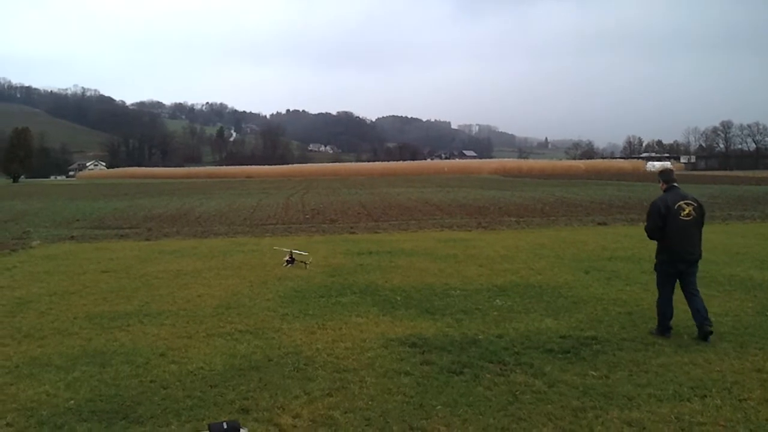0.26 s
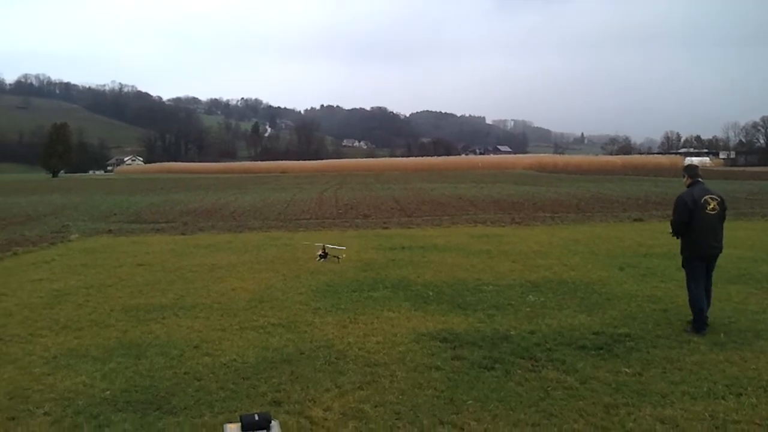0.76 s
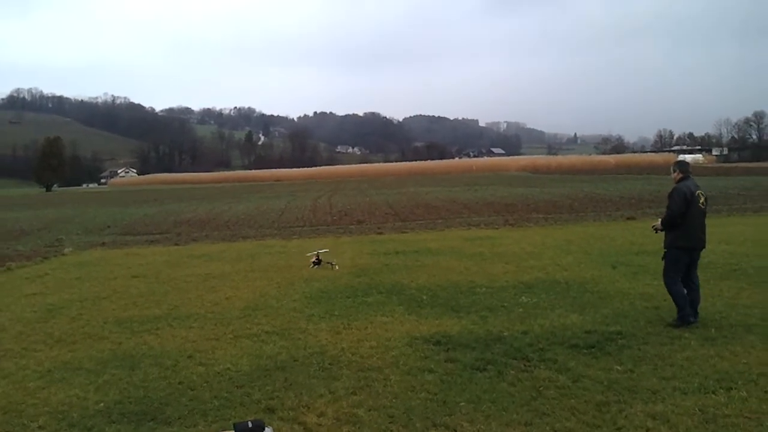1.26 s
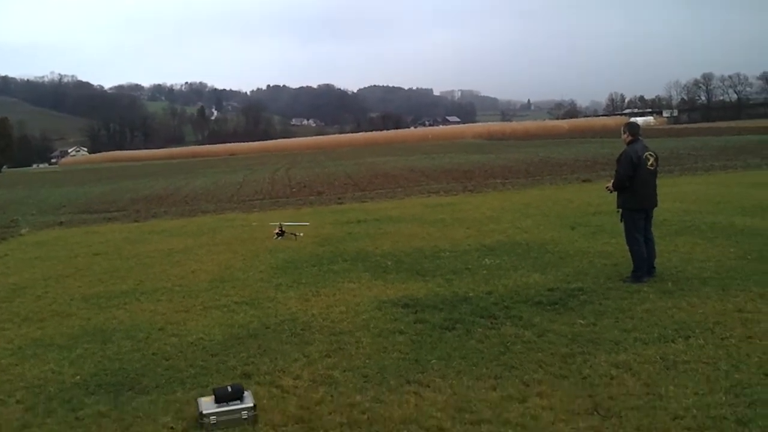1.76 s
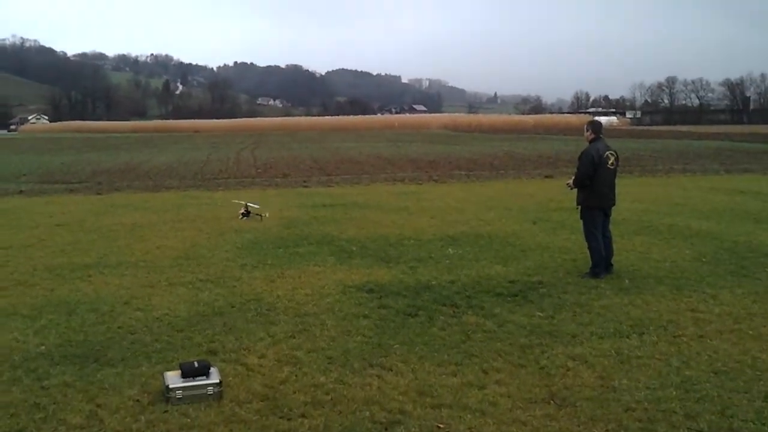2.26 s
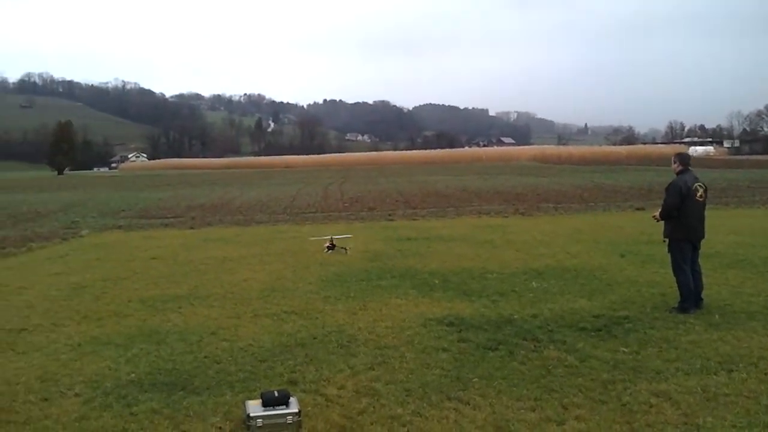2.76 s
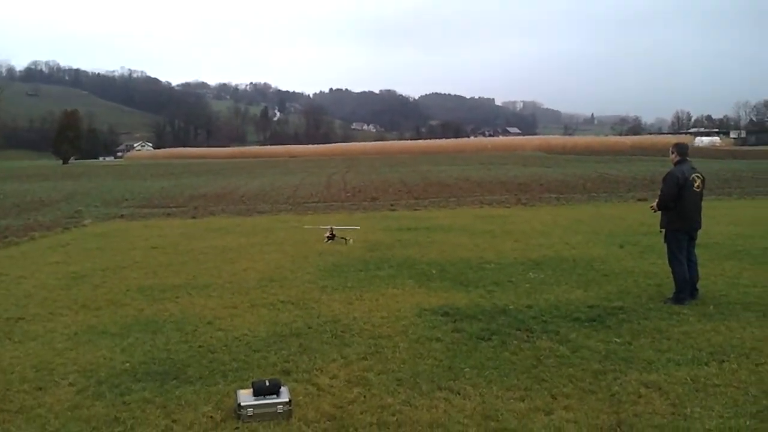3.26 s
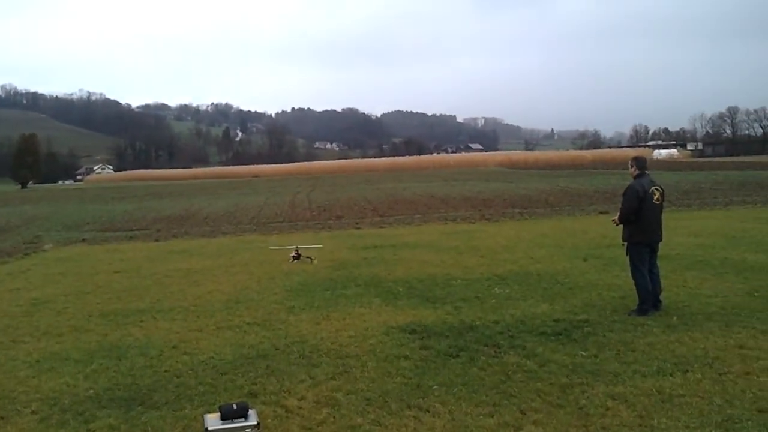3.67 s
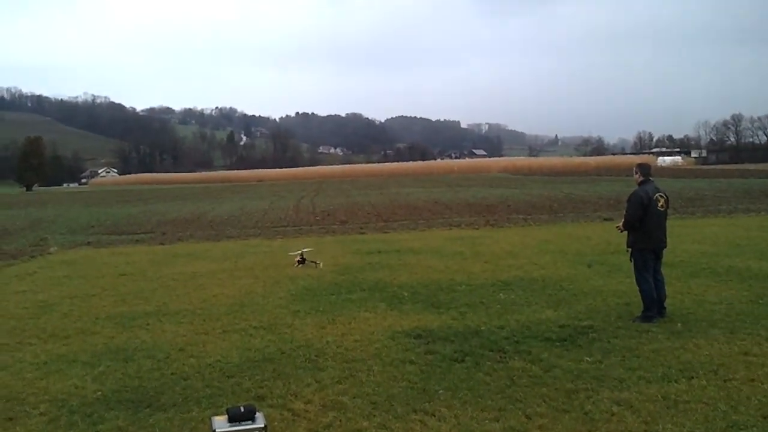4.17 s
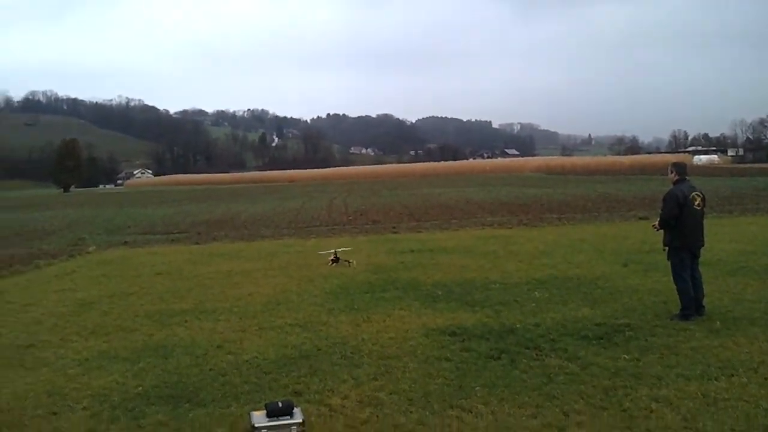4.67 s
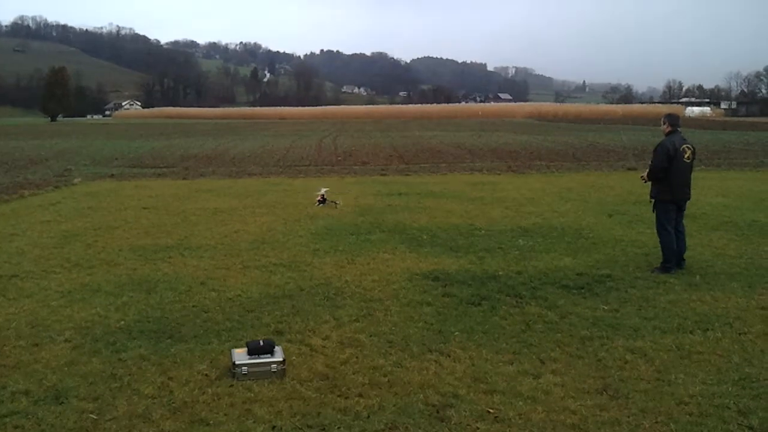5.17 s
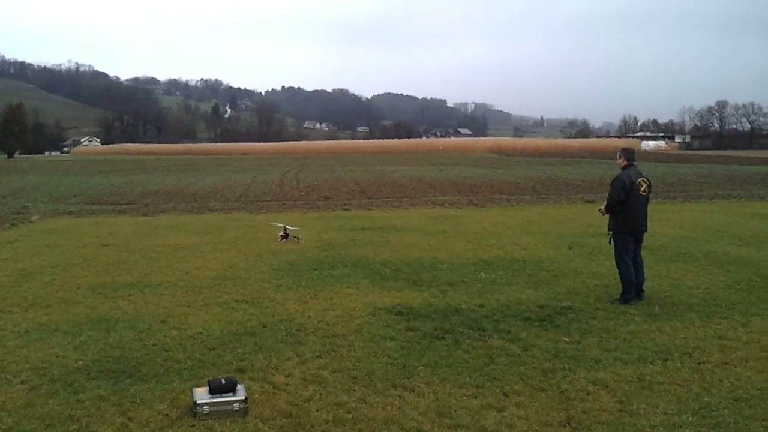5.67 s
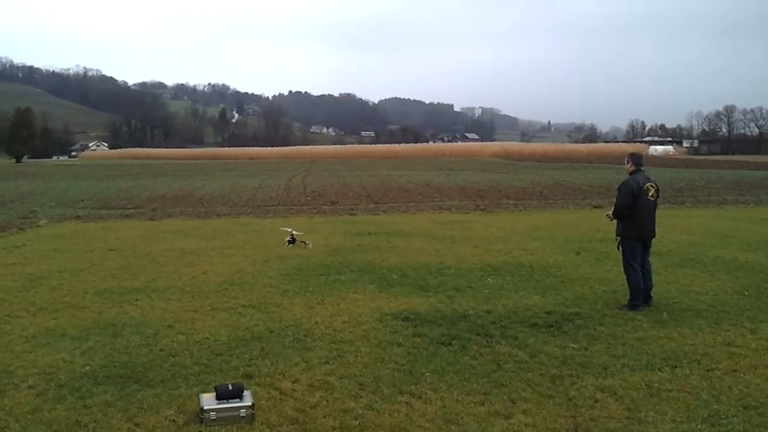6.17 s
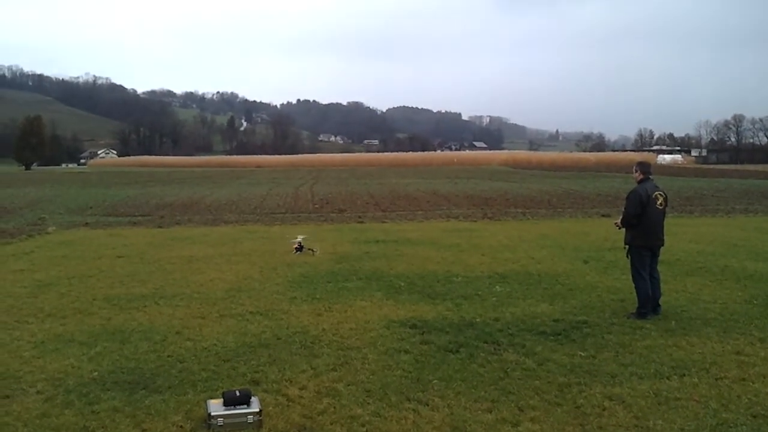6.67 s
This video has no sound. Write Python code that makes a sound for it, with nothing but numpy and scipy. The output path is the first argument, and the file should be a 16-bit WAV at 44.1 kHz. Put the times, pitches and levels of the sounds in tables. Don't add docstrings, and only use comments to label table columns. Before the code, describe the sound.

Rattling knocks and a low electric whine speed up into a high, shrill gear whine with rotor rush, while wind thumps the microphone.

```python
import sys
import numpy as np
from scipy import signal
from scipy.fft import rfft, irfft
from scipy.io import wavfile

SR = 44100
rng = np.random.default_rng(int(sys.argv[2]) if len(sys.argv) > 2 else 0)


def elevation(decibels):
    levels = np.asarray(decibels, float)
    return 10 ** (levels / 20)


def transcribe(signal):
    frames = np.atleast_2d(signal).T
    limited = np.clip(frames, -1, 1)
    pcm = np.round(limited * 32767).astype(np.int16)
    wavfile.write(sys.argv[1], SR, pcm)


N = 304731
TIME = np.arange(N) / SR

GEAR_TEETH, PINION_TEETH = 170, 14
TAIL_RATIO = 3.75
# pitch_hz, level_db (per Hz)
GEAR_HISS = [(2500, -21), (3200, -10), (3800, -5.5), (4500, 1.5), (5200, 3), (5900, 7), (6400, 3),
             (6850, -1.5), (7500, 0), (9000, -13)]


def rms_one(x):
    return x / np.sqrt(np.mean(x ** 2) + 1e-20)


def in_time(rows):
    s, *columns = np.transpose(rows)
    return [np.interp(TIME, s, column) for column in columns]


def at_hz(points, hz):
    points_hz, points_db = np.array(points).T[:2]
    return np.interp(np.log(hz), np.log(points_hz), points_db)


def drift(rate):
    r = np.exp(-16 * np.pi * rate / SR)
    noise = rng.standard_normal(N // 8 + 8002)
    slow = signal.lfilter([1], [1, -2 * r, r * r], noise)[8000:]
    return np.interp(np.arange(N) / 8, np.arange(len(slow)), rms_one(slow - slow.mean()))


def coloured(spectrum):
    hz = np.maximum(np.fft.rfftfreq(N, 1 / SR), 1)
    inside = (hz > spectrum[0][0]) & (hz < spectrum[-1][0])
    return rms_one(irfft(rfft(rng.standard_normal(N)) * elevation(at_hz(spectrum, hz)) * inside, N))


def resonate(x, hz, width_hz):
    r = np.exp(-np.pi * max(width_hz, 5) / SR)
    top = np.array([1, 0, -1]) * (1 - r * r) / 2
    return signal.lfilter(top, [1, -2 * r * np.cos(2 * np.pi * hz / SR), r * r], x)


def whine(mesh_hz, teeth, wobble, lead, rough):
    # pitch_hz, width_hz, level_db (rms)
    frame_modes = [(610, 130, -44.5), (753, 110, -38.5), (997, 180, -39.5), (1345, 81, -53.5),
                   (1784, 350, -41.5), (2110, 24, -44), (2447, 74, -33), (2997, 450, -30.5),
                   (3501, 147, -28), (4020, 60, -47.5), (3956, 100, -35), (4396, 376, -20.5),
                   (4734, 213, -12.5), (4945, 70, -27.5)]
    # pitch_hz, width_hz, depth_db
    nodes = [(2306, 90, -18), (2565, 34, -7), (2752, 110, -19), (3685, 73, -10), (4015, 77, -5),
             (4643, 71, -4), (4947, 57, -16)]
    # pitch_hz, width_hz, second_db, third_db (rms)
    plate_modes = [(1510, 250, -50, -64), (2020, 300, -54.5, -58), (2450, 200, -61.5, -59),
                   (3020, 330, -46, -56), (3380, 200, -47, -49), (3520, 240, -47.5, -62),
                   (4430, 350, -37.5, -49), (4724, 200, -31.5, -51), (5330, 290, -40.5, -41),
                   (6033, 360, -24, -58.5), (6552, 450, -32, -28), (6954, 67, -31, -51),
                   (7270, 330, -39, -38.5), (7640, 380, -53, -37)]
    # pitch_hz, level_db (rms)
    frame = [(3600, -74), (4300, -53), (4800, -50.5), (5030, -62), (5450, -56), (5850, -54), (6150, -44),
             (6350, -56), (6520, -44.5), (6800, -50.5), (7200, -50.5), (7900, -40)]
    # offset_shaft_turns, level_db (against the overtone)
    run_out = [(-2, -30), (-1, -23), (1, -22), (2, -30)]
    # start_s, depth (0-1), angle_turns
    throb = [
        (0, 0.05, -0.13),
        (3.3, 0, -0.1),
        (3.9, 0.4, 0.0),
        (4.4, 0, 0.13),
        (4.8, 0.05, -0.087),
        (5.2, 0.62, 0.048),
        (5.6, 0.43, 0.077),
        (6.1, 0.22, -0.08),
        (6.6, 0.24, -0.22),
        (6.91, 0.24, -0.4),
    ]
    low_db = [through_modes(frame_modes, column=2, hz=mesh_hz, nodes=nodes)]
    low_db += [through_modes(plate_modes, column=k, hz=k * mesh_hz) for k in (2, 3)]
    depth, angle = in_time(throb)
    turn = 2 * np.pi * (teeth / GEAR_TEETH + angle)
    slack = np.clip((1250 - mesh_hz) / 250, 0, 1)
    tail = 2 * np.pi * (teeth * TAIL_RATIO / GEAR_TEETH - .85)
    drag = elevation(slack * (4 * np.cos(tail) + 2.5 * drift(20) - 1))
    swell = (1 + np.clip(1.305 * depth, 0, .95) * np.cos(turn)) * drag
    phase = 2 * np.pi * teeth + wobble * np.sin(turn + lead) + 1.7 * slack * np.sin(tail + 1.88)
    shaft = 2 * np.pi * teeth / PINION_TEETH
    engaged = np.clip((mesh_hz - 1030) / 90, 0, 1)
    loaded = np.clip((mesh_hz - 2500) / 500, 0, 1)
    favour_db = {}
    for offset, _ in run_out:
        side_hz = mesh_hz * (1 + offset / PINION_TEETH)
        favour_db[offset] = 0.65 * (through_modes(frame_modes, column=2, hz=side_hz) - low_db[0])
    out = np.zeros(N)
    for k in range(1, 7):
        if k < 4:
            level = elevation(low_db[k - 1])
        else:
            dip_db = 5.0 * (k == 4) * (mesh_hz > 1410) * (mesh_hz < 1720)
            level = engaged * elevation(at_hz(frame, k * mesh_hz) + 3.5 * drift(11) - 2.5 - dip_db)
        top_hz = 8800 if k < 4 else 7900 if k < 6 else 7350
        carrier = np.exp(1j * k * phase) * (k * mesh_hz < top_hz)
        sides = 0
        for offset, db in run_out:
            strength = elevation(db + (k == 1) * favour_db[offset] + 2.5 * drift(20))
            sides = sides + strength * np.exp(1j * (offset * shaft + 2 * drift(30)))
        sides = (.3 + loaded) * (.35 if k == 1 else 2.5) * sides
        errors = rough * (1 + (k - 1) * loaded + 8.8 * (k > 3)) * (drift(90) + 1j * drift(70))
        skirt = 0.06 * loaded * (drift(260) + 1j * drift(260))
        out += np.sqrt(2) * level * swell * (carrier * (1 + sides + errors + skirt)).imag
    return out


def through_modes(modes, column, hz, nodes=()):
    grid = np.arange(0, SR / 2, 4.)
    power = elevation(2 * -65)
    for mode in modes:
        power = power + elevation(2 * mode[column]) / (1 + (2 * (grid - mode[0]) / mode[1]) ** 2) ** 2
    dead_db = sum(db * np.exp(-2 * ((grid - node_hz) / width_hz) ** 2) for node_hz, width_hz, db in nodes)
    return np.interp(hz, grid, 10 * np.log10(power) + dead_db)


def drive_lines(teeth, fade_s):
    # mesh_multiple, start_s, end_s, level_db (rms)
    lines = [(.0465, 4.34, 7.2, -53), (.062, 4.4, 6.6, -54.5), (.124, 5.6, 11, -48), (.136, 3.1, 7.3, -52),
             (.204, 5.6, 9.9, -49.5), (.772, 3.4, 3.7, -52), (.93, 3.85, 4.8, -43),
             (1.07, 5.05, 6.5, -39.5), (1.14, 4.9, 7.5, -49), (1.235, 3.68, 4.1, -40),
             (1.36, 4.8, 5.6, -57), (1.498, 5.45, 6.4, -44.5), (.69, 6.15, 6.55, -43),
             (.929, 5.5, 7.2, -44), (1.64, 3.4, 4.6, -52), (1.769, 3.6, 4.4, -48), (1.86, 3.7, 5.6, -52),
             (1.932, 3.2, 5.0, -49.5)]
    out, throb = np.zeros(N), np.cos(2 * np.pi * teeth / GEAR_TEETH)
    for multiple, start, end, db in lines:
        fade = np.clip(np.minimum(TIME - start, end - TIME) / fade_s, 0, 1)
        beads_db = (8 if .9 < multiple < 1.3 else 5) * min(multiple, 1) * throb
        level = elevation(db + 3.0 * drift(7.5) + beads_db)
        smear = .6 * drift(10) + .8 * multiple * drift(45)
        out += fade * level * np.sin(2 * np.pi * multiple * teeth + smear)
    return out


def rattle(teeth, knock_s):
    # pitch_hz, width_hz, level_db
    canopy = [(3105, 480, -5), (4210, 140, -5.5), (4787, 73, 2), (5380, 140, -3), (6186, 110, 5),
              (6740, 290, -2), (7140, 220, -13.5)]
    knock_at_s, knock_db = knocks(teeth)
    at = (knock_at_s * SR).astype(int)
    after = np.arange(int(.08 * SR)) / SR / knock_s
    burst = after * np.exp(1 - after)
    clicks = elevation(1.2 * rng.exponential(1, N)) * rng.choice([-1, 1], N)
    clicks = clicks * (rng.random(N) < 12000 / SR)
    buzz = np.interp(TIME, [0, 1.0, 1.9, 2.2], [1.6, 0.76, 2.6, 0.084])
    uneven_db = rng.normal(0, 2.3, (len(at), len(canopy)))
    out = np.zeros(N)
    for (hz, width_hz, db), share_db in zip(canopy, uneven_db.T):
        strikes = np.zeros(N)
        strikes[at] = elevation(knock_db + share_db + db + 7.0)
        bursts = signal.fftconvolve(strikes, burst)[:N] + elevation(db - 43) * buzz
        out += resonate(resonate(bursts * clicks, hz, width_hz), hz, 3 * width_hz)
    tail_turns = np.floor(teeth * TAIL_RATIO / GEAR_TEETH - .38)
    taps = np.diff(tail_turns, prepend=tail_turns[0]) * elevation(2.7 * drift(20))
    taps = taps * np.interp(TIME, [.3, .7, 1.1, 1.6], [0.33, 0.95, 0.42, 0])
    return out + elevation(-42 + 55) * resonate(taps + 1e-18, hz=735, width_hz=51)


def knocks(teeth):
    lead_turns = .33 * np.interp(np.gradient(teeth) * SR, [800, 930], [0, 1])
    turns = teeth * TAIL_RATIO / GEAR_TEETH + lead_turns - .38
    chance = rng.normal(size=(32, 4))
    hit = np.arange(len(chance)) + 0.068 * chance[:, 0]
    rebound = hit + .45 + .1 * chance[:, 1]
    s = np.interp(np.r_[hit, rebound], turns, TIME)
    rise_db = 13.5 * np.minimum(s, .9)
    fade_db = 8.5 * np.maximum(s - 0.71, 0)
    uneven_db = np.r_[1.5 * chance[:, 2], 3 * chance[:, 3] - 5.5]
    return s, np.where(s < 1.53, -39.5 + rise_db - fade_db + uneven_db, -120)


def hiss(teeth, blade_db, gear_db, grind_db):
    # pitch_hz, level_db (per Hz)
    rush = [(190, -31.5), (330, -6), (413, -8.5), (548, -1.5), (727, -1), (984, -1), (1240, -4), (1680, 1),
            (2010, -1.5), (2800, -7.5), (3400, -7.5), (4420, -46), (7480, -120)]
    turn = 2 * np.pi * teeth / GEAR_TEETH
    blades = elevation(blade_db + 9.5 + 0.081 * np.cos(turn) + 0.79 * drift(11.0)) * coloured(rush)
    flutter = elevation(0.66 * np.cos(turn - .8) + 1.2 * drift(84))
    gears = elevation(gear_db - 2) * coloured(GEAR_HISS)
    ground_teeth = elevation(grind_db + 6.0) * grind(teeth, per_tooth=24)
    return blades + flutter * off_ground(gears + ground_teeth)


def grind(teeth, per_tooth):
    # mesh_multiple, level_db
    bands = [(.6, -4), (.8, 2.5), (.94, 0.5), (1.0, 7.5), (1.1, -5.5), (1.22, -7), (1.45, -9), (1.6, -11),
             (1.71, -19), (1.85, -7.5), (2.0, 4), (2.15, -12), (2.4, -17), (3.2, -1.5)]
    count = int(teeth[-1] * per_tooth) + 2
    multiple = np.maximum(np.fft.rfftfreq(count, 1 / per_tooth), .01)
    shape = elevation(at_hz(bands, multiple)) * (multiple > bands[0][0]) * (multiple < bands[-1][0])
    along = irfft(rfft(rng.standard_normal(count)) * shape, count)
    heard = np.interp(teeth * per_tooth, np.arange(count), along)
    hz = np.maximum(np.fft.rfftfreq(N, 1 / SR), 1)
    return rms_one(irfft(rfft(heard) * elevation(at_hz(GEAR_HISS, hz)), N))


def effort(mesh_hz):
    # start_s, level_db
    load = [(0.0, -4), (0.52, -4.5), (0.96, 1.5), (2.04, 1.5), (2.31, -1), (2.46, 2), (2.64, 3), (2.9, 2.5),
            (3.08, 2), (3.31, 10), (3.58, 6.5), (4.06, 10.5), (4.22, 1.5), (5.0, 3), (5.25, 8.5),
            (6.29, -1), (6.64, -1), (6.91, -1.5)]
    load_db, = in_time(load)
    speed = mesh_hz / 5000
    blade_db = -53 + 6 * speed ** 2
    grind_db = -40.5 + 9.5 * np.log2(speed) + .1 * load_db
    return blade_db, -49 + load_db, grind_db


def off_ground(x):
    # start_s, delay_ms, strength (0-1)
    echo = [
        (0.0, .9, 0.0),
        (3.8, 0.56, 0.09),
        (4.05, 0.97, 0.3),
        (4.3, 0.83, 0.5),
        (4.87, 0.791, 0.5),
        (5.0, 0.95, 0.6),
        (5.3, 0.73, 0),
        (5.8, 0.777, 0.2),
        (6.91, .79, 0),
    ]
    delay_ms, strength = in_time(echo)
    strength = np.clip(strength, 0, .62)
    delayed = np.interp(TIME - delay_ms / 1000, TIME, x)
    return (x + strength * delayed) / np.sqrt(1 + strength ** 2)


def tick():
    click = np.zeros(N)
    click[round(4.921 * SR)] = -4 * elevation(-21)
    return resonate(click + 1e-18, hz=2900, width_hz=2200)


def wind():
    # pitch_hz, level_db (per Hz)
    buffet = [(15, -58), (25, -25.5), (78, -7), (130, 1.5), (267, -5), (389, -15.5), (565, -29),
              (730, -18.5), (900, -45), (1170, -38.5), (1980, -120)]
    # pitch_hz, level_db (per Hz)
    rumble = [(12, -40), (20, -29), (47, 8), (70, 16.5), (167, -3.5), (312, -16), (400, -16.5), (450, 4),
              (580, -30), (990, -120)]
    # start_s, peak_db, pitch_hz
    thumps = [(0.255, -27, 132), (0.382, -27, 117), (0.813, -29, 161), (1.294, -21, 156), (1.319, -18, 197),
              (1.35, -18.5, 119), (1.436, -18.5, 113), (1.489, -19, 170), (1.522, -16.5, 124),
              (1.751, -21, 183), (1.83, -24, 240), (1.924, -16.5, 145), (2.001, -18, 130),
              (2.039, -22.5, 91.5), (2.097, -23.5, 150), (3.03, -25.5, 125), (3.109, -25, 161),
              (3.304, -25, 95), (3.42, -16.5, 200), (3.451, -21, 111.3), (3.546, -24.5, 107),
              (3.714, -18, 255), (3.737, -20, 96.9), (3.779, -17.5, 173), (3.856, -17, 192),
              (4.641, -26, 106), (5.214, -19, 117), (5.991, -30, 151), (6.658, -24.5, 145),
              (6.81, -21.5, 138)]
    # start_s, peak_db, pitch_hz
    slaps = [
        (1.6612, -4.5, 383),
        (1.678, -9, 330),
    ]
    buffet_db = gusts()
    out = elevation(buffet_db - 5.5 + 3.64 * drift(14)) * coloured(buffet) + elevation(-50) * coloured(rumble)
    for s, db, hz in [*thumps, *slaps]:
        cycles = np.arange(int(3 * SR / hz)) * hz / SR
        thump = elevation(db + 2) * np.sin(2 * np.pi * cycles) * cycles * np.exp(1 - 2.25 * cycles)
        at = round(s * SR)
        out[at:at + len(thump)] += thump[:N - at]
    return out


def gusts():
    # middle_s, half_length_s, level_db
    bells = [(0.073, 0.026, -53), (0.254, 0.051, -34.5), (0.42, 0.032, -37), (0.74, 0.088, -46),
             (1.08, 0.02, -42), (1.427, 0.14, -35), (1.667, 0.027, -23.5), (1.625, 0.18, -31),
             (1.948, .16, -33), (2.4, 0.16, -46.5), (3.09, 0.19, -44.5), (3.32, 0.082, -40),
             (3.454, 0.017, -26.5), (3.568, 0.023, -29.5), (3.747, 0.058, -25.5), (3.865, 0.02, -28.5),
             (3.936, 0.023, -27), (4.05, 0.057, -37), (4.615, 0.056, -43), (5.216, 0.051, -41.5),
             (6.02, 0.046, -27), (6.21, 0.083, -30), (6.81, 0.36, -41.5)]
    power = sum(elevation(2 * db) * np.exp(-2 * ((TIME - s) / half_s) ** 2) for s, half_s, db in bells)
    return 10 * np.log10(power + elevation(2 * -48))


def scene():
    # start_s, mesh_hz
    mesh = [(0.0, 604), (0.8, 848), (1.0, 991), (1.2, 1089), (1.6, 1233), (2.1, 1390), (2.3, 1728),
            (2.5, 1950), (2.8, 2156), (3.0, 2369), (3.3, 2942), (3.6, 3317), (4.0, 3660), (4.6, 3923),
            (5.6, 4216), (6.2, 4462), (6.6, 4775), (6.91, 4995)]
    mesh_hz, = in_time(mesh)
    teeth = np.cumsum(mesh_hz) / SR
    tone = whine(mesh_hz, teeth, wobble=1.05, lead=1.4, rough=.07)
    drive = tone + drive_lines(teeth, fade_s=0.24)
    noises = rattle(teeth, knock_s=0.004) + hiss(teeth, *effort(mesh_hz))
    return (drive + noises + tick() + wind())[None]


def band_limit(x):
    return signal.sosfilt(signal.butter(12, 9110, fs=SR, output="sos"), x)


def record(dry):
    rate_hz = 16000
    band = signal.sosfilt(signal.butter(8, 8000, fs=SR, output="sos"), dry)
    mirrored = elevation(-7) * 2 * band * np.cos(2 * np.pi * rate_hz * TIME)
    played = signal.sosfilt(signal.butter(12, 7700, fs=SR, output="sos"), band + mirrored)
    played = played - 0.82 * resonate(played, rate_hz / 2, width_hz=120)
    return band_limit(played)


dry = scene()
out = record(dry)
transcribe(out)
```